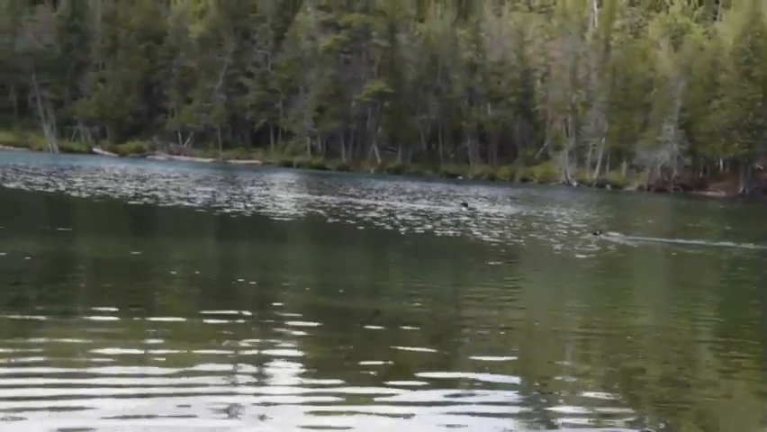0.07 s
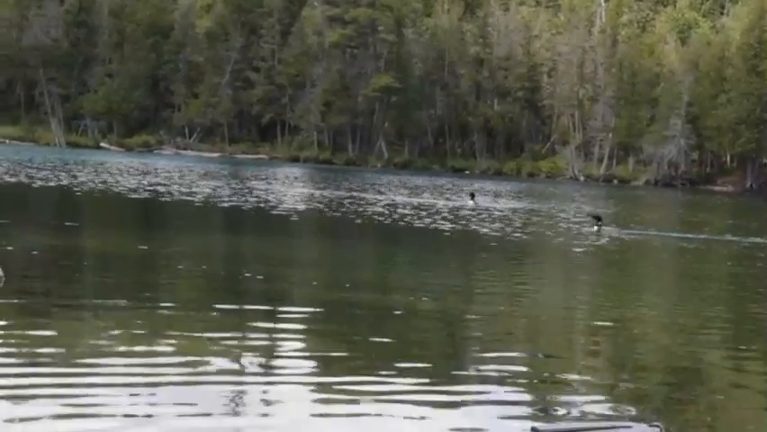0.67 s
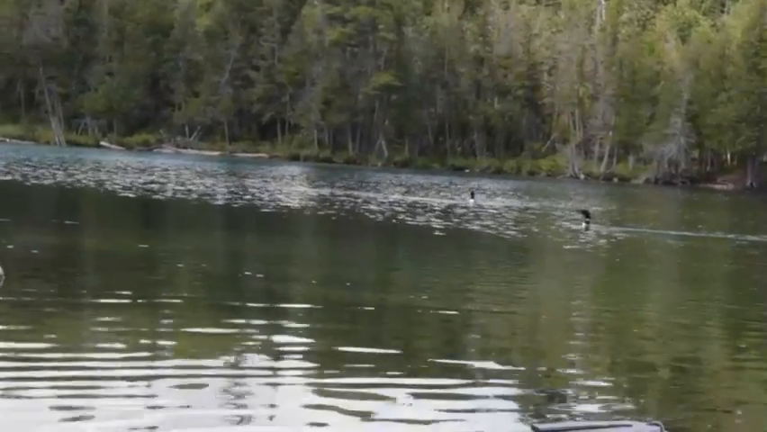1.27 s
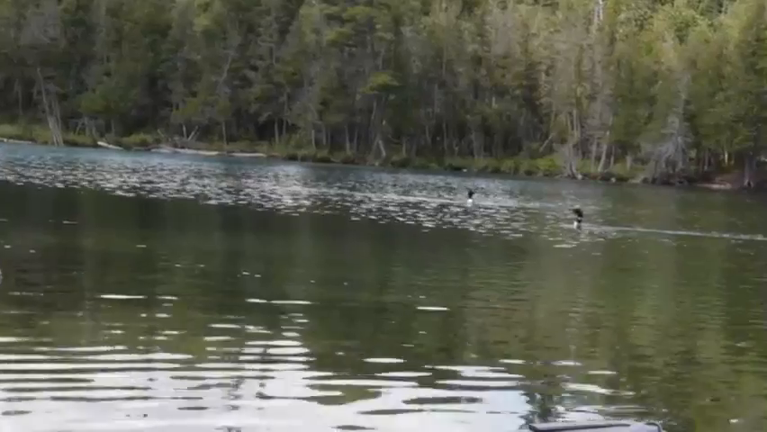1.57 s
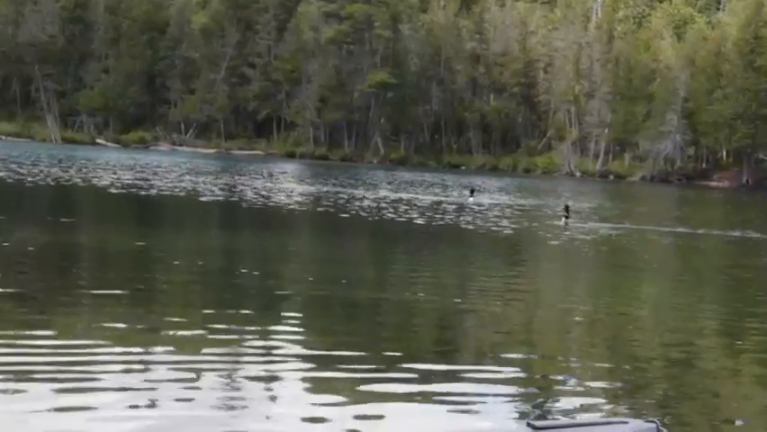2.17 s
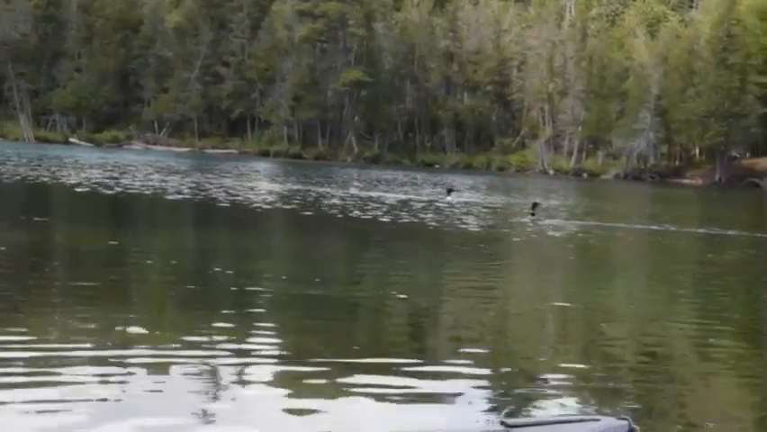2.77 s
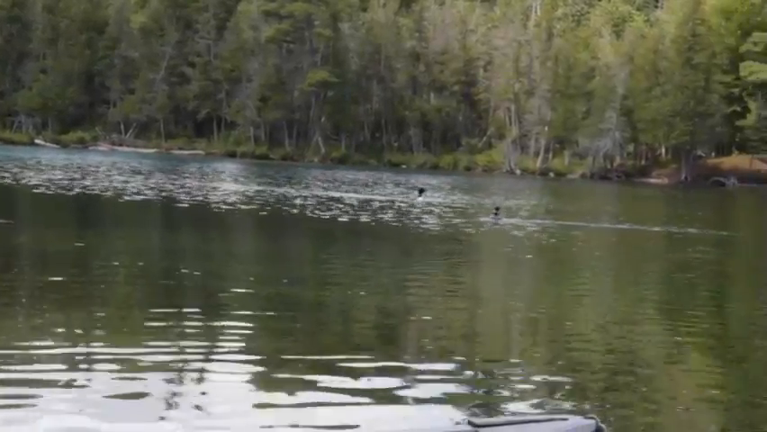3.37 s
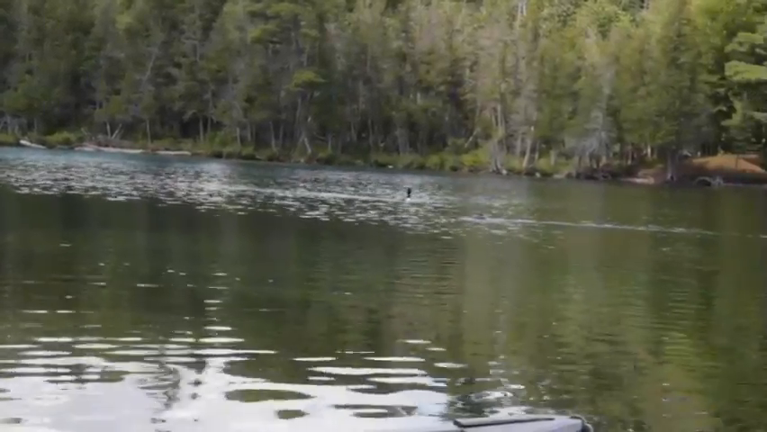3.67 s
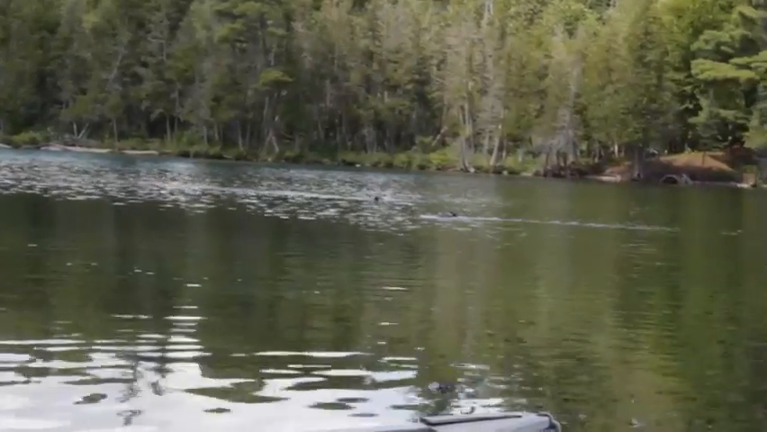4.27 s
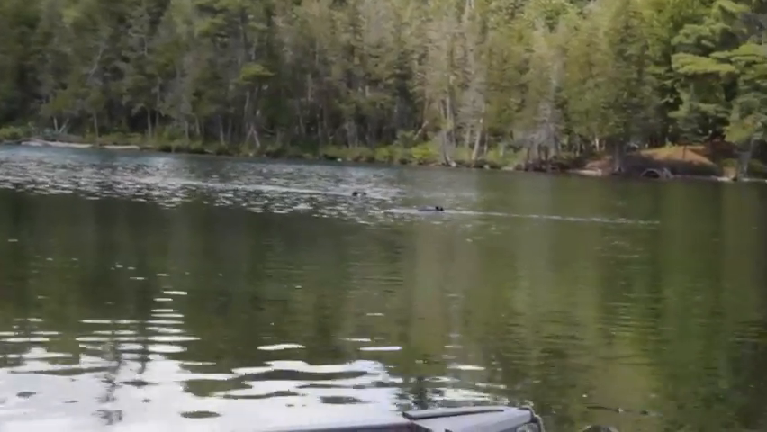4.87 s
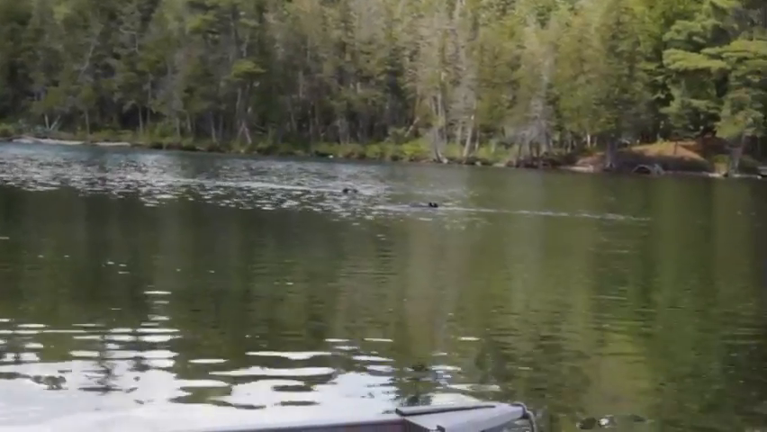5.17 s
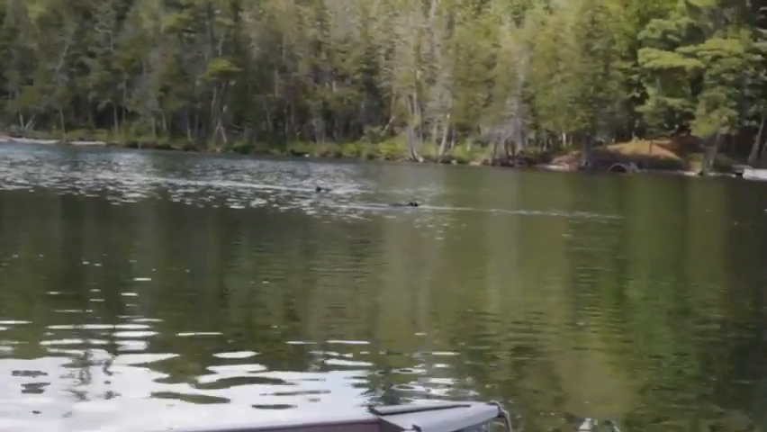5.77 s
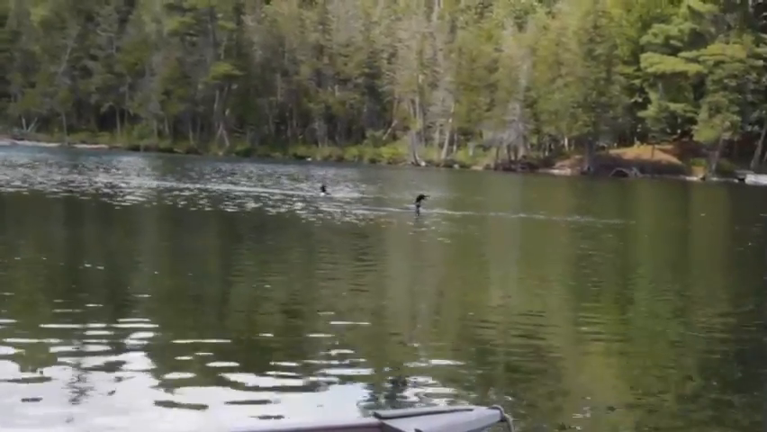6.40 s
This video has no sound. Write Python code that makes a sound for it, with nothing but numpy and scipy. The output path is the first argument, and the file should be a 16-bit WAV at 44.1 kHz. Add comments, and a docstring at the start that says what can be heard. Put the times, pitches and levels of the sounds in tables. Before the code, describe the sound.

A soft knock on a hollow boat sounds close by at the very start, over faint outdoor air and a barely audible low hum. From about 0.6 to 1.4 seconds, loons call far out on the lake, loud and clear. Each call starts low and reedy, then breaks into a pure high note that wavers about twelve times a second and sags at its end. A second burst runs from 1.9 to 3 seconds, and a third from 3.3 to 4. The wooded shore returns a long echo after each. A few tiny ticks are scattered nearby, with a dull, faint bump at 2.6 seconds. Between 4.5 and 5.9 seconds, as the echo dies away, there are three quiet hollow knocks with light, gritty scuffs close to the microphone. At about 6.4 seconds another loon call rises and is cut short.

```python
"""A soft knock, then two loons trade tremolo calls far out on a calm lake ringed by forest.
Each call starts in a low, reedy register of the syrinx, breaks up into a pure high one and swings in
pitch about twelve times a second. The wooded shore throws back a long echo.
Near by: soft knocks on hollow wood, gritty scuffs and small ticks, over faint air and a low hum."""
import sys
import numpy as np
from scipy import signal
from scipy.fft import rfft, irfft, next_fast_len
from scipy.io import wavfile

SR = 44100
rng = np.random.default_rng(int(sys.argv[2]) if len(sys.argv) > 2 else 0)


def generate_wav(sig):
    """Save sig (samples, or channels by samples) to the path in sys.argv[1] as 16-bit PCM at SR."""
    pcm = np.round(np.clip(np.atleast_2d(sig).T, -1, 1) * 32767).astype(np.int16)
    wavfile.write(sys.argv[1], SR, pcm)


N = 292824
TOP_HZ = 15750
BEND_DB_PER_OCT = 36.5  # a climbing note swells, a sinking one fades

# High register, partial levels: (frequency [Hz], gain [dB])
HIGH_THROAT_DB = [(1400, 0.5), (1900, -30), (2400, -30.5), (2900, -24), (3400, -27), (3900, -29),
                  (4750, -32), (5100, -45.5), (6000, -46.5), (7200, -42.5), (8300, -55.5), (9500, -45),
                  (10500, -63), (12000, -61.5), (14000, -74.5)]
# Body of each call: (start [s], end [s], crest time [s], tremolo period [s], crest pitch [Hz],
# depth [0-1], crest narrowness [2 = sine], final sag [0-1], level [dB], trough dip [dB], overtones [dB],
# overtone ramp [dB/s], start tilt [dB/oct], end tilt [dB/oct], throat stretch [ratio])
HIGH_CALL_NOTES = [ (0.703, 1.063, .7437, 0.083, 1214, 0.25, 1.19, .12, -10.5, -16, 2, 7.5, -6, 3, 0.94),
                   (1.124, 1.295, 1.121, 0.088, 1339, 0.16, 2.1, .08, -13, -11, 7.5, 1, -4.5, 1, 1.35),
                   (2.029, 2.508, 2.0185, 0.085, 1210, 0.23, 1.18, 0.21, -11, -11, 3, 15, 1.5, 3, 1.01),
                   (2.519, 2.929, 2.579, 0.092, 1258, .175, 1.95, 0.11, -12.5, -10.5, 0.5, -28.5, -55, 28, .89),
                   (3.464, 3.953, 3.449, .0842, 1198, .21, 1.35, .16, -11.5, -9.5, 3.5, 12.5, -2, 5, 0.989),
                   (6.484, 6.651, 6.4775, 0.082, 1282, .21, 2, 0.01, -10, -12, 0, -19, 0, 3, 1.2), ]


def high_register(tire_s=0.09, lag_cycles=0.35, dull_db_per_oct=-16, bright_db_per_oct=28):
    """Pure notes hold their swing, then run out of push: they slow, sink, fade and dull."""
    out = np.zeros(N)
    for (start, end, crest, period, crest_hz, depth, arch, sag, level_db, dip_db,
         overtone_db, ramp_db_per_s, start_tilt, end_tilt, stretch) in HIGH_CALL_NOTES:
        t = np.arange(start, end, 1 / SR)
        tired = np.exp((t - end) / tire_s)
        height, push = tremolo((t - crest) / period - lag_cycles * tired, arch)
        bend_oct = np.log2(1 - sag * tired)
        hz = crest_hz * 2 ** bend_oct * (1 - depth * (1 - height))
        db = level_db + BEND_DB_PER_OCT * bend_oct + dip_db * (1 - push)
        bright_db = overtone_db + ramp_db_per_s * (t - t.mean()) + bright_db_per_oct * bend_oct
        tilt = np.linspace(start_tilt, end_tilt, len(t)) + dull_db_per_oct * tired
        voice = syrinx(t, hz, height, bright_db, tilt, HIGH_THROAT_DB, stretch,
                       slack_db=-11.5, rasp_db=-51, jitter=0.00091, fade_s=0.0063)
        add(out, start, amp(db) * voice)
    return out


# Low register, partial levels: (frequency [Hz], gain [dB])
LOW_THROAT_DB = [(600, -5), (900, -8), (1400, -4), (1850, -2.5), (2100, -15), (2600, -24.5), (3000, -33),
                 (3700, -22.5), (5000, -27.5), (6500, -37), (8000, -46), (14000, -65.5)]
# Notes that open and close the calls: (start [s], end [s], crest time [s], tremolo period [s],
# pitch at that crest [Hz], depth [0-1], glide [oct/s], level [dB], overtones [dB], tilt [dB/oct],
# throat stretch [ratio], fundamental [dB])
LOW_CALL_NOTES = [ (0.628, 0.7, 0.66, 0.06, 773.5, 0.1, 1.6, -19, -4.5, -9, 1.02, -1.5),
                  (.923, 1.128, .945, 0.088, 855, .17, 0.75, -19, -2.5, -1, 0.98, 0.5),
                  (1.065, 1.18, 1.109, 0.11, 697.4, 0.15, 0.5, -28, -7, -2.5, 1.4, 4.5),
                  (1.29, 1.403, 1.328, 0.11, 844, 0.21, -0.54, -17, -3.5, -9.5, 0.98, -1.5),
                  (1.924, 2.028, 1.957, 0.072, 723, .13, 3.5, -25.5, -4, 4, 0.88, 4),
                  (2.441, 2.516, 2.495, 0.13, 838, 0.23, .1, -13, -10, -28, 1.03, -7),
                  (2.507, 2.53, 2.46, .1, 625, 0.07, 1.3, -35.5, -14.5, -14.5, 0.77, 8),
                  (2.923, 3.029, 2.966, 0.11, 677, .055, -0.55, -27.5, -21, -9.5, 1, -2),
                  (3.341, 3.461, 3.369, 0.088, 737, .135, 2.06, -25, -2.5, 0.5, 0.87, 3),
                  (3.947, 3.972, 4, 0.11, 622, 0.18, 0.5, -41.5, -21, -6, 1, 7.5),
                  (6.362, 6.381, 6.376, .1, 580, 0.3, 45, -33.5, -7, -8.5, 1.06, -2.5),
                  (6.379, 6.484, 6.399, 0.082, 782, 0.14, 2.5, -19, -8.5, -0.5, 0.95, -3), ]


def low_register(bloom_s=0.01, onset_db=-7, dull_db=-13.5, swell_db_per_oct=44, bright_db_per_oct=38):
    """Reedy notes start soft and dull, bloom, and swing evenly as they climb or sink."""
    out = np.zeros(N)
    for (start, end, crest, period, crest_hz, depth, glide, level_db,
         overtone_db, tilt, stretch, fundamental_db) in LOW_CALL_NOTES:
        t = np.arange(start, end, 1 / SR)
        onset = np.exp((start - t) / bloom_s)
        height, push = tremolo((t - crest) / period)
        bend_oct = glide * (t - crest)
        hz = crest_hz * 2 ** bend_oct * (1 - depth * (1 - height))
        dip_db = swell_db_per_oct * np.log2(1 - depth * (1 - push))
        db = level_db + onset_db * onset + BEND_DB_PER_OCT * bend_oct + dip_db
        bright_db = overtone_db + dull_db * onset + bright_db_per_oct * bend_oct
        voice = syrinx(t, hz, height, bright_db, tilt, LOW_THROAT_DB, stretch, slack_db=-8.5,
                       rasp_db=-41.5, jitter=0.0028, fade_s=0.0048, fundamental_db=fundamental_db)
        add(out, start, amp(db) * voice)
    return out


def tremolo(cycles, arch=1.5, plateau=1.66):
    """Pitch height and breath push: 0 in a trough, 1 on a crest. Push holds up longer."""
    height = np.abs(np.cos(np.pi * cycles)) ** arch
    return height, 1 - (1 - height) ** plateau


def syrinx(t, hz, height, overtone_db, tilt_db_per_oct, throat, stretch, slack_db, rasp_db, jitter,
           fade_s, fundamental_db=0, knee_hz=3800, trough_db_per_oct=-6):
    """Harmonics sweep the throat's peaks over faint rasp; overtones die away in each trough."""
    overtone_db = overtone_db + slack_db * (1 - height) ** 2
    tilt = tilt_db_per_oct + trough_db_per_oct * (1 - height)
    phase = 2 * np.pi * np.cumsum(hz * (1 + jitter * drift(len(t), 300))) / SR
    voice = amp(rasp_db + overtone_db) * unit(coloured(rng.standard_normal(len(t)), throat, 4))
    for k in range(1, int((TOP_HZ - 1) / hz.max()) + 1):
        partial_hz = k * hz
        treble_oct = np.maximum(np.log2(partial_hz / knee_hz), 0)
        db = spectrum_db(throat, partial_hz / stretch) + tilt * treble_oct + (k == 1) * fundamental_db
        if k > 2 or partial_hz.max() > 2050:
            flicker_db = 2.6 * drift(len(t), 70)
            db = db + overtone_db + flicker_db
        voice = voice + np.sqrt(2) * amp(db) * np.sin(k * phase)
    fade = np.clip(np.minimum(t - t[0], t[-1] - t) / fade_s, 0, 1)
    return voice * fade


# Register flips: (time [s], level [dB])
VOICE_CRACKS = [(1.124, -52), (2.026, -41), (3.464, -41.5), (6.486, -44.5)]


def voice_cracks(half_width_s=0.0041):
    """The voice breaks into a brief rough burst as it flips into the high register."""
    t = np.arange(N) / SR
    rough = unit(coloured(rng.standard_normal(N), LOW_THROAT_DB, 4.5))
    return rough * sum(amp(db) * np.exp(-((t - s) / half_width_s) ** 2) for s, db in VOICE_CRACKS)


# Reflections off water, near bank and far shore: (delay [s], gain [dB])
REFLECTIONS = [(.0033, -41), (0.0118, -22.5), (0.017, -21.5), (0.024, -18.5), (.041, -23.5), (.072, -27.5),
               (.088, -26.5), (.17, -30.5), (.35, -40.5), (.965, -41.5)]
# Forest scatter envelope: (delay [s], relative level [dB])
FOREST_ENVELOPE = [(.01, 3), (0.099, 4.5), (0.299, -14.5), (.6, -9.5), (.85, -7), (.96, -14),
                   (1.049, -11.5), (1.351, -19), (1.598, -21.5), (2.401, -35.5)]
# Forest scatter colour: (frequency [Hz], gain [dB])
FOREST_SPECTRUM = [(500, -7.5), (850, 5), (1150, 1.5), (1700, -0.5), (2400, -2.5), (4000, -5),
                   (8000, -16.5), (14000, -28.5)]


def shore_echo(calls, forest_db=-21, tail_s=2.5):
    """A few distinct reflections, plus scatter from countless trunks."""
    t = np.arange(round(tail_s * SR)) / SR
    delay_s, db = np.transpose(FOREST_ENVELOPE)
    scatter = rng.standard_normal(len(t)) * amp(np.interp(t, delay_s, db)) * (t > delay_s[0])
    response = amp(forest_db) * coloured(scatter / np.linalg.norm(scatter), FOREST_SPECTRUM)
    for s, echo_db in REFLECTIONS:
        add(response, s, amp([echo_db]))
    return signal.fftconvolve(calls, response)[:N]


# Knocks: (time [s], relative level [dB], ring [Hz], t60 [s], tick re ring [dB], tick top edge [Hz])
HULL_KNOCKS = [(0.0185, -31, 281, 0.044, -11.5, 5000), (2.576, -39.5, 92.6, 0.14, -1, 400),
               (4.571, -41, 169, 0.031, -1, 789.8), (4.581, -48.5, 243, 0.036, 9.5, 906),
               (5.321, -43.5, 394, 0.027, -4, 1516), (5.744, -43, 523, 0.033, -8, 1500)]


def knocks(rise_s=0.0018, tick_s=0.0068):
    """A bump on a hollow hull or dock: a dull tick and one damped low ring."""
    out, t = np.zeros(N), np.arange(SR // 4) / SR
    attack = 1 - np.exp(-t / rise_s)
    for s, db, hz, t60_s, tick_db, edge_hz in HULL_KNOCKS:
        ring = np.sin(2 * np.pi * hz * t) * np.exp(-np.log(1000) * t / t60_s)
        band = signal.butter(2, [edge_hz / 7, edge_hz], "band", fs=SR, output="sos")
        noise = unit(signal.sosfilt(band, rng.standard_normal(len(t))))
        tick = amp(tick_db) * noise * np.exp(-t / tick_s)
        add(out, s, 2 * amp(db) * (ring + tick) * attack)
    return out


# Scuffs on the shore: (centre [s], Gaussian sigma [s], level [dB], tilt [dB/oct])
SHORE_SCUFFS = [(4.679, 0.086, -52, 1), (4.83, 0.032, -63, 8), (5.30, 0.042, -51, 4.5),
                (5.385, 0.06, -51.5, 2), (5.734, 0.041, -48.5, 1.5), (5.823, .09, -58, 1)]
# Friction colour: (frequency [Hz], relative level [dB])
SCUFF_SPECTRUM = [(100, -1), (400, 5.5), (800, 5), (1600, 2), (2600, -5.5), (4500, -13.5), (8000, -27),
                  (15000, -30)]


def scuffs(grain_db=1.5):
    """Short swells of gritty friction noise."""
    out, t = np.zeros(N), np.arange(-SR // 2, SR // 2) / SR
    for s, sigma_s, db, tilt in SHORE_SCUFFS:
        grit = rng.standard_normal(len(t)) * amp(grain_db * drift(len(t), 180))
        swell = np.exp(-0.5 * (t / sigma_s) ** 2)
        add(out, s + t[0], amp(db) * unit(coloured(grit, SCUFF_SPECTRUM, tilt)) * swell)
    return out


# Ticks: (centre [s], level [dB], frequency [Hz], bandwidth [Hz], half width [s])
SMALL_TICKS = [(1.437, -56, 5820, 1472, 0.0043), (1.497, -53.5, 9100, 7050, 0.013),
               (1.63, -60, 6030, 2030, 0.0022), (1.684, -53.5, 5970, 1990, 0.0021),
               (2.864, -43.5, 4720, 1314, 0.0022), (3.021, -53, 5620, 1530, 0.0021),
               (4.822, -51, 3100, 303, 0.0043), (5.68, -54, 4870, 1200, 0.0096),
               (6.22, -57, 6500, 3050, .005)]


def ticks():
    """Tiny bursts of high, band-passed noise."""
    out, t = np.zeros(N), np.arange(-SR // 2, SR // 2) / SR
    for s, db, hz, width_hz, half_width_s in SMALL_TICKS:
        noise = signal.lfilter(*signal.iirpeak(hz, hz / width_hz, SR), rng.standard_normal(len(t)))
        add(out, s + t[0], amp(db) * unit(noise) * np.exp(-(t / half_width_s) ** 2))
    return out


# Air colour: (frequency [Hz], relative density [dB])
AIR_SPECTRUM = [(25, -14), (45, -11), (68, -14), (100, -7), (129, -4.5), (180, -11), (215, -8.5),
                (360, -11.5), (700, -12.5), (1900, -19), (3000, -21), (7000, -26), (10000, -29),
                (15700, -27.5)]


def air(level_db=-53.5):
    """Steady, quiet outdoor hiss."""
    return amp(level_db) * unit(coloured(rng.standard_normal(N), AIR_SPECTRUM))


# Hum tones: (frequency [Hz], level [dB])
HUM_TONES = [(97, -77.5), (123.8, -69), (150, -66), (215.3, -69.5)]


def hum(waver=0.014, swell_db=3.5):
    """Far-off low tones, each wavering in pitch and level."""
    out = np.zeros(N)
    for hz, db in HUM_TONES:
        phase = 2 * np.pi * np.cumsum(hz * (1 + waver * drift(N, 8))) / SR
        out += np.sqrt(2) * amp(db + swell_db * drift(N, 5.2)) * np.sin(phase)
    return out


def amp(db):
    """Decibels to gain."""
    return 10 ** (np.asarray(db) / 20)


def unit(x):
    """Scales to rms 1."""
    return x / np.sqrt(np.mean(x ** 2) + 1e-20)


def spectrum_db(spectrum, hz):
    """Interpolates a spectrum on a log-frequency axis."""
    points_hz, db = np.transpose(spectrum)
    return np.interp(np.log(hz + 1), np.log(points_hz), db)


def coloured(x, spectrum, tilt_db_per_oct=0):
    """Filters x by a tilted spectrum."""
    size = next_fast_len(len(x), True)
    hz = np.fft.rfftfreq(size, 1 / SR)
    db = spectrum_db(spectrum, hz) + tilt_db_per_oct * np.log2((hz + 100) / 1000)
    return irfft(rfft(x, size) * amp(db), size)[:len(x)]


def drift(size, rate_hz):
    """Random wander, rms about 1."""
    at = np.arange(size) * 2 * rate_hz / SR
    knots = rng.standard_normal(int(at[-1]) + 2)
    return np.sqrt(3 / 2) * np.interp(at, np.arange(len(knots)), knots)


def add(mix, start_s, sound):
    """Mixes a sound in at start_s."""
    part = mix[max(round(start_s * SR), 0):][:len(sound)]
    part += sound[:len(part)]


def scene():
    """The loons and their echo over the quiet shore, in mono."""
    loons = low_register() + high_register() + voice_cracks()
    return (loons + shore_echo(loons) + knocks() + scuffs() + ticks() + air() + hum())[None]


def record(dry):
    """Steep low-pass at TOP_HZ."""
    lowpass = signal.firwin(601, TOP_HZ, window=("kaiser", 9), fs=SR)
    return signal.oaconvolve(dry, lowpass[None], "same")


dry = scene()
out = record(dry)
generate_wav(out)
```